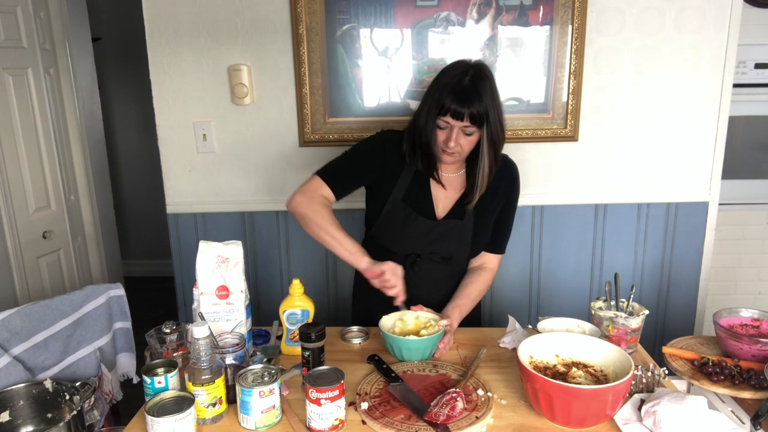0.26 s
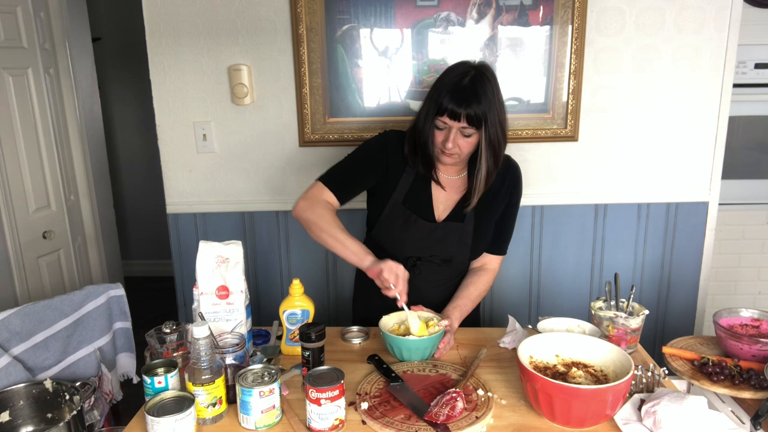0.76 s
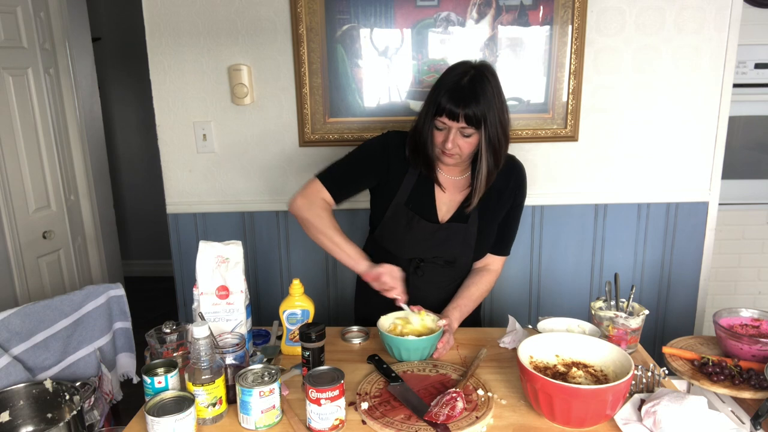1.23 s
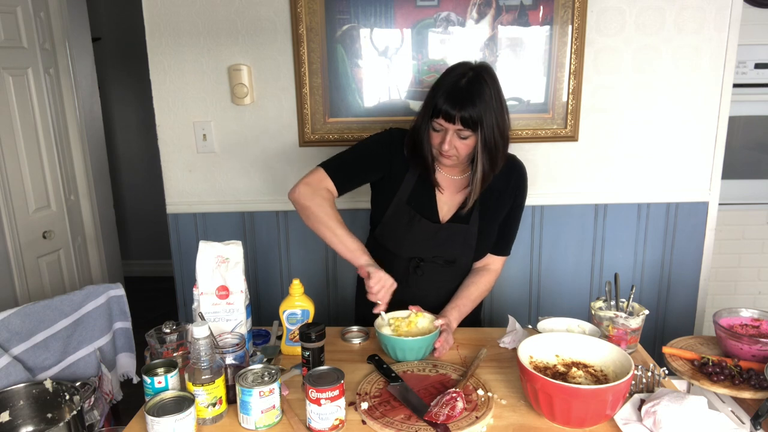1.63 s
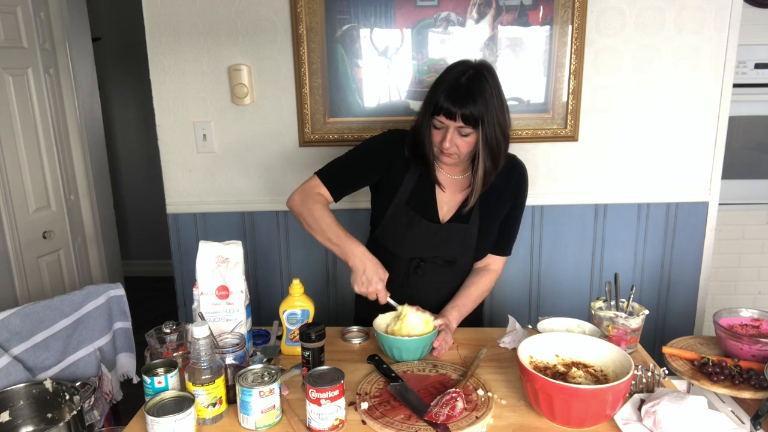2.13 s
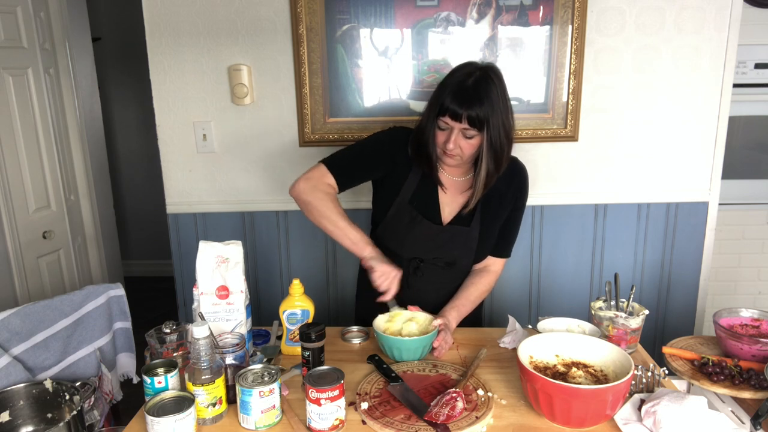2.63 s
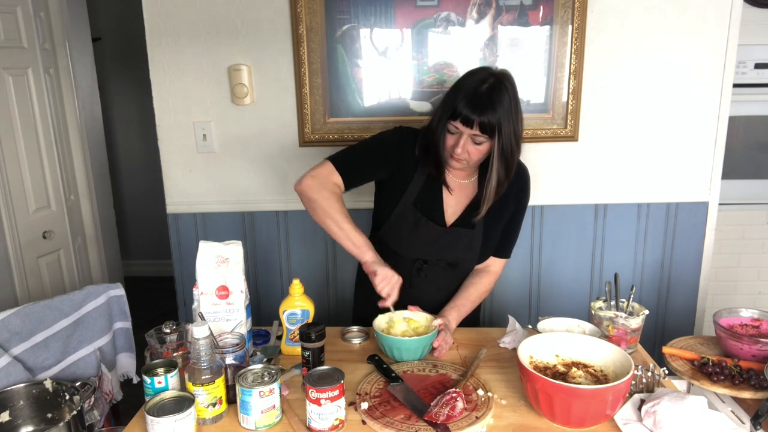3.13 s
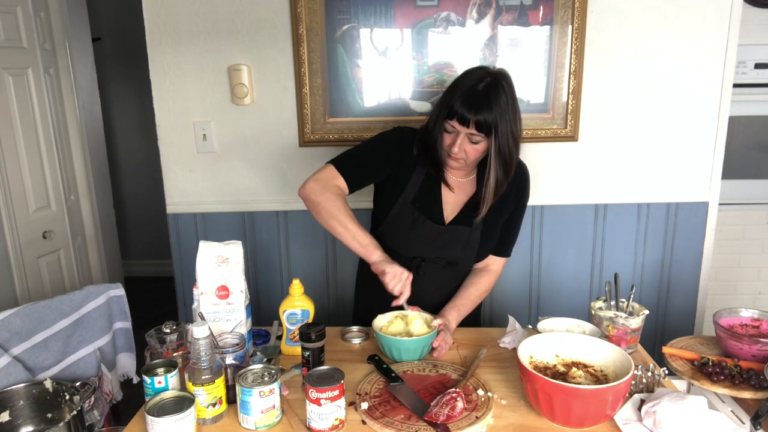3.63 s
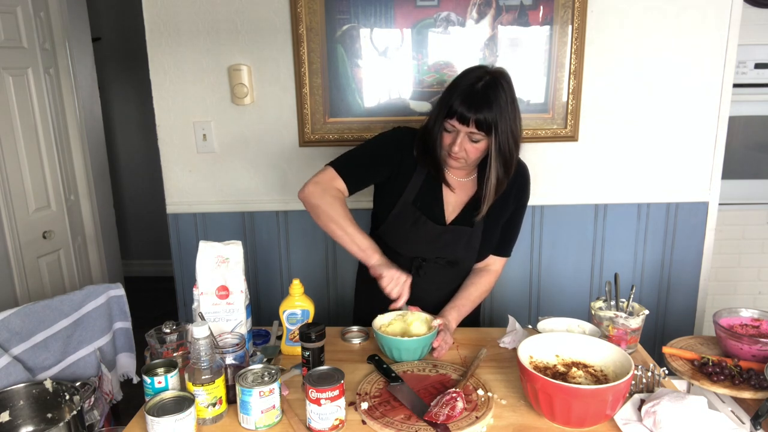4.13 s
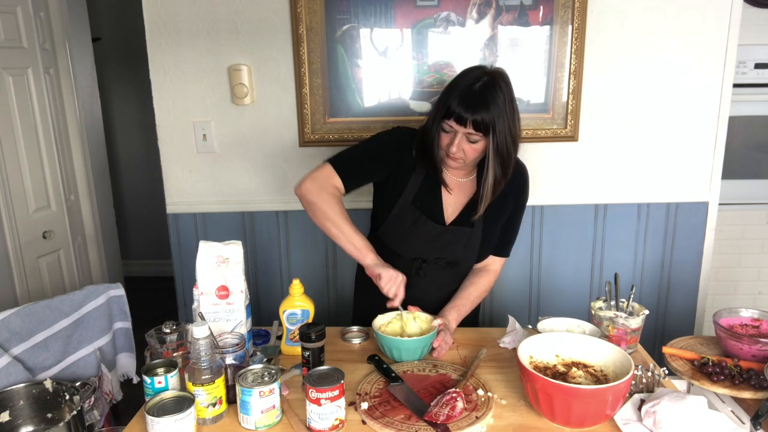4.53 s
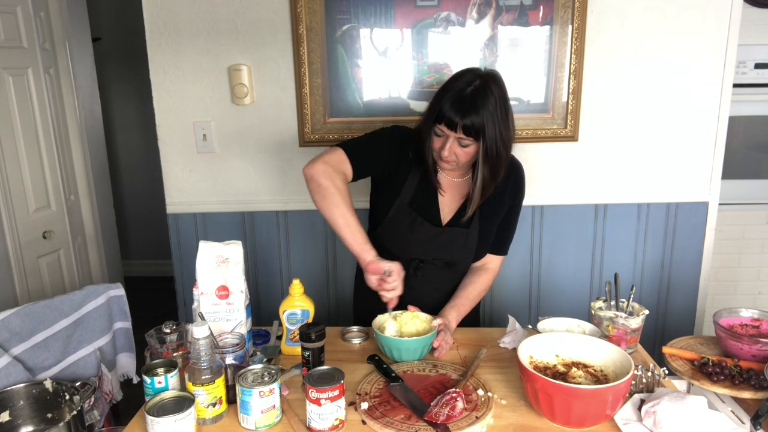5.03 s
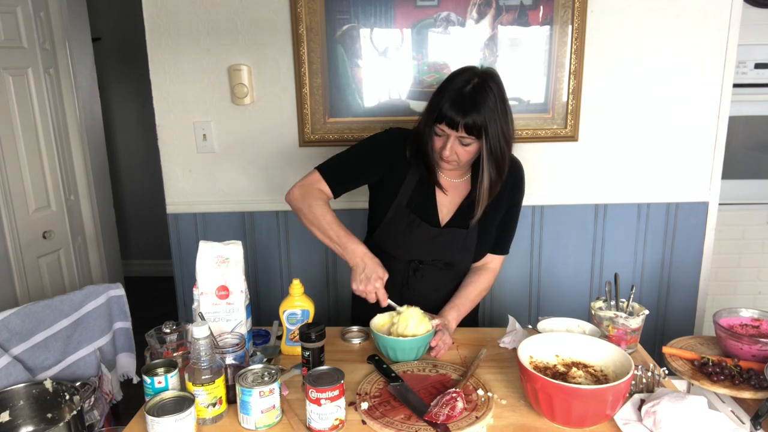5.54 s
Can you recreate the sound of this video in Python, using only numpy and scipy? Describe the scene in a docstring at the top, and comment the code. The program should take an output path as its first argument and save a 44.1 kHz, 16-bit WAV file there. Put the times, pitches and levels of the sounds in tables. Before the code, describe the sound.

Soft, sticky squelches of food being mashed in a bowl, broken by spoon knocks and dull table bumps in a kitchen.

```python
"""Soft food squishes and ticks as a metal spoon stirs and mashes it in a hand-held ceramic bowl.
Tiny wet pockets burst with each push. Now and then the spoon knocks on the bowl or drags along
its wall, and the bowl thuds on a wooden table. The filled bowl rings only briefly: the long
tails belong to the hard-walled kitchen, as the sound crosses it to the microphone."""
import sys
import numpy as np
from scipy import signal
from scipy.fft import rfft, irfft
from scipy.io import wavfile
from scipy.ndimage import uniform_filter1d

SR = 44100
rng = np.random.default_rng(int(sys.argv[2]) if len(sys.argv) > 2 else 0)


def wav_record(signal):
    """Record a signal, one row per channel, as 16-bit PCM in the file named by sys.argv[1]."""
    frames = np.transpose(np.atleast_2d(signal))
    bounded = np.clip(frames, -1, 1)
    # unit amplitude maps onto the largest positive 16-bit level
    quanta = np.round(bounded * 32767).astype(np.int16)
    wavfile.write(sys.argv[1], SR, quanta)


N = 255162
TIME = np.arange(N) / SR

# Table levels are relative: each function adds its own gain. A fade is the time to drop by 60 dB.
# pushes of the spoon: t/s, length/s, squish level/dB, churn level/dB, wetness (treble lift)/dB
PUSHES = [(0.0, 0.21, -76, -66, 16), (0.185, 0.23, -69.5, -75, 7), (0.449, 0.13, -65, -72.5, 5),
          (0.798, 0.093, -62, -73, 1), (1.446, 0.037, -60, -60, 14), (1.557, 0.115, -62.5, -65, -14),
          (2.03, 0.285, -72, -75.5, -2), (2.306, 0.3, -70.5, -70.5, 7), (2.583, 0.21, -69, -97, 12),
          (2.803, 0.13, -63, -72.5, 4.5), (2.992, 0.31, -75.5, -75, -1), (3.269, 0.462, -65, -75.5, -6.5),
          (3.695, 0.37, -67.5, -73, 4.5), (4.046, 0.12, -65.5, -70, 10), (4.234, 0.15, -69.5, -72, 4),
          (4.448, 0.22, -70, -74, 1), (5.586, 0.63, -72, -76, -7)]
# tone of the wet squish and of the low churn: f/Hz, level/dB
SQUISH_TONE = [(290, -29), (500, -1), (553, -10), (1040, -5.5), (1410, -3.5), (1530, -9), (1700, -4.5),
               (2360, -7), (4770, -8.5), (8600, -18), (15500, -18.5)]
CHURN_TONE = [(20, -49), (40, -17), (75, -6), (120, -5.5), (280, -1), (450, 2), (800, -10), (1600, -15),
              (5000, -75)]

def food_squish(squish_db=-6, churn_db=-8, pivot_hz=2800, patchy_db=4.5,
                attack_s=0.012, release_s=0.036, sag_db=-2):
    """Tiny wet pockets burst in patches over a soft low churn, following the push of the spoon."""
    squish_level, churn_level = np.zeros(N), np.zeros(N)
    for start, length, squish, churn, _ in PUSHES:
        t = np.arange(0, length, 1 / SR)
        effort = np.clip(np.minimum(t / attack_s, (length - t) / release_s), 0, 1)
        effort *= amp(sag_db * t / length)  # eases off as the food gives way
        add(squish_level, start, amp(squish) * effort)
        add(churn_level, start, amp(churn) * effort)
    starts, lengths, *_, lifts = np.transpose(PUSHES)
    wetness = np.interp(TIME, starts + lengths / 2, lifts)
    hz = np.fft.rfftfreq(N, 1 / SR)
    mash, patch_times = np.zeros(N), np.arange(0, TIME[-1], .05)
    for centre in np.geomspace(600, 13000, 9):
        band = hump(hz, centre, octaves=0.77) * amp(read(SQUISH_TONE, hz))
        pockets = irfft(rfft(grains(per_s=450, spread_db=5.5)) * band, N)
        patches = np.interp(TIME, patch_times, rng.standard_normal(len(patch_times)))
        mash += pockets * amp(patchy_db * patches + wetness * np.log10(centre / pivot_hz))
    churning = colour(grains(per_s=600, spread_db=2.5), CHURN_TONE)
    return amp(squish_db) * squish_level * unit(mash) + amp(churn_db) * churn_level * churning


# sticky food pops off the spoon: t/s, level/dB, air pocket f/Hz, top of the tear f/Hz
POPS = [(0.0099, -30, 1180, 5330), (0.204, -36, 3140, 7900), (0.3147, -31.5, 1440, 6900),
        (0.5168, -41, 1496, 7020), (0.6011, -40.5, 3460, 10900), (0.7958, -37.5, 3800, 9200),
        (1.455, -34, 3250, 7600), (1.5766, -37.5, 2670, 7100), (2.038, -38, 3800, 9900),
        (2.353, -35.5, 1190, 11400), (2.688, -44, 2800, 5640), (2.858, -32.5, 1050, 3950),
        (2.868, -40, 2800, 6000), (2.9861, -38.5, 1980, 5630), (3.0089, -39.5, 1390, 4800),
        (3.0197, -36, 1140, 5000), (3.06, -45.5, 6700, 14000), (3.2282, -40.5, 5440, 13000),
        (3.2996, -37.5, 850, 4520), (3.4496, -42, 3000, 11900), (3.8999, -35.5, 1440, 4020),
        (3.9538, -38, 2690, 4200), (4.0552, -38, 3200, 9300), (4.0988, -31, 3440, 5700),
        (4.1405, -33.5, 1720, 3000), (4.475, -42, 2500, 5600), (4.524, -42, 2900, 11000),
        (4.6538, -39.5, 2920, 4960)]

def food_pops(level_db=-2, hollow_db=3, crackle=0.34, strands_per_s=3000):
    """Air pockets tear open and sticky strands snap: small pockets tick, big ones squelch lower."""
    out, t = np.zeros(N), np.arange(SR // 12) / SR
    for start, db, low_hz, high_hz in POPS:
        size = 3000 / np.sqrt(low_hz * high_hz)  # bigger pockets crackle longer
        strands = rng.standard_normal(len(t)) * (rng.random(len(t)) < strands_per_s / SR)
        burst = crackle * size * strands * np.exp(-t / (0.0032 * size))
        burst[0] = 1  # the first tear
        def snap_db(hz):
            tear = -20 * np.log10(1 + (low_hz / (hz + 100)) ** 2 + (hz / high_hz) ** 6)
            return tear + hollow_db * hump(hz, 1.02 * low_hz, octaves=0.55)
        pop = signal.fftconvolve(burst, click(snap_db, lag_s=0.002004))
        add(out, start, amp(db + level_db) * pop / np.linalg.norm(pop))
    return out


# spoon hits bowl: t/s, level/dB, extra thud/dB, struck spot f/Hz, lift at that pitch/dB,
# treble edge f/Hz (higher for a harder hit), spoon ring level/dB
KNOCKS = [(0.8679, 0, -9, 1860, 11.5, 1880, -24), (1.1362, 2, 0.5, 1240, 3, 6000, -27),
          (1.7007, -3.5, -6, 1680, 8, 4100, -35), (1.7036, -5, 7, 760, 8.5, 1680, -34),
          (1.842, -11, 1.5, 1016, 14.5, 4984, -25), (1.8862, -13, -5, 1190, 13, 2400, -25),
          (1.9118, -15.5, 4.5, 1200, 7, 2800, -12), (4.8008, -5, -1, 3620, 6, 5200, 9.5),
          (5.3606, -10, -28, 1150, 9, 2220, -7), (5.3718, -4, -8, 792, 4.5, 3770, -16)]
# tone of a knock: f/Hz, level/dB
KNOCK_TONE = [(25, -25), (50, -26), (80, -2.5), (120, -27), (165, -1.5), (220, -4.5), (330, 7), (430, 5),
              (580, -2.5), (850, -6.5), (1700, -0.5), (3000, -3.5), (6500, 0), (16000, -3.5)]
# notes of the bowl, damped by food and hand, and of the spoon bouncing clear: f/Hz, level/dB, fade/s
BOWL_NOTES = [(843, 5.5, 0.036), (953, 0.5, 0.013), (1088, -5, 0.044), (1245, -6.5, 0.17),
              (1350, -4.5, 0.015), (1636, 1.5, 0.071), (1741, -18, 0.13), (2120, -16, 0.04),
              (3060, -3, 0.018), (3530, 3.5, 0.0068), (4140, -4, 0.0053), (4610, 4.5, 0.029),
              (4860, -3, 0.012), (5700, -8.5, 0.012), (6250, -12, 0.018), (7260, -8.5, 0.0089)]
SPOON_NOTES = [(2200, -4.5, 0.019), (2400, -1.5, 0.032), (2550, 2.5, 0.13), (2580, -0.5, 0.011),
               (4040, -5, 0.052), (4390, 2, 0.011), (4500, -22, .09), (6450, 3, 0.051), (6500, 3, 0.023),
               (6800, -15, .04), (9170, 0.5, 0.022)]

def spoon_knocks(level_db=-4, spoon_db=4, thud_hz=447, fall_db_per_decade=29.5):
    """Each hit thuds through the table and sets bowl and spoon ringing; harder hits are brighter."""
    out = np.zeros(N)
    bowl, spoon = ringing(BOWL_NOTES, click_gain=0.45), ringing(SPOON_NOTES, click_gain=0)
    for start, db, thud_db, spot_hz, spot_db, edge_hz, ring_db in KNOCKS:
        def contact_db(hz):
            thud = thud_db / (1 + (hz / thud_hz) ** 4)
            spot = spot_db * hump(hz, spot_hz, octaves=0.45)
            treble_loss = fall_db_per_decade * np.log10(np.hypot(1, hz / edge_hz))
            return read(KNOCK_TONE, hz) + thud + spot - treble_loss
        blow = click(contact_db, lag_s=0.003213)
        ring = bowl + amp(ring_db + spoon_db) * spoon
        add(out, start, amp(db + level_db) * signal.fftconvolve(blow, ring))
    return out


# drags along the bowl, one list a stroke: t/s, wall level/dB, grit level/dB, whine f/Hz, whine level/dB
SCRAPES = [
    [(1.662, -56.5, -66, 820, -60), (1.799, -46.5, -59.5, 940, -66), (1.847, -52, -61, 1130, -53.5),
     (1.915, -48.5, -58, 1154, -47), (1.96, -80, -58, 1130, -82)],
    [(5.035, -50.5, -63, 780, -64), (5.07, -50.5, -52.5, 868, -62), (5.14, -74, -46, 1305, -45),
     (5.189, -57.5, -49.5, 1260, -50), (5.215, -62.5, -52.5, 1200, -64), (5.355, -62.5, -56, 1100, -78)],
]
# tone of the rubbed wall and of the gritty treble: f/Hz, level/dB
WALL_TONE = [(60, -17), (200, -3.5), (350, 7.5), (600, 4), (900, -8.5), (1350, 4), (1800, -9), (3000, -5),
             (6000, -44), (15000, -52)]
GRIT_TONE = [(300, -17.5), (1500, -2), (2100, 6.5), (2800, 6), (3400, -4), (4600, 2.5), (6300, 1.5),
             (8000, -3), (9500, -7.5), (12500, -7.5), (16000, -18)]

def spoon_scrapes(wall_db=-7, grit_db=-5, whine_db=-9, width_hz=300, judder_db=2, judder_per_s=90):
    """The spoon sticks and slips, shaking the wall, with grit and a gliding whine where it touches."""
    out = np.zeros(N)
    pole = np.exp(-np.pi * width_hz / SR)
    for stroke in SCRAPES:
        times, *controls = np.transpose(stroke)
        pressure, roughness, whine_hz, swell = (np.interp(TIME, times, c) for c in controls)
        contact = np.clip(np.minimum(TIME - times[0], times[-1] - TIME) / .012, 0, 1)
        catches = np.interp(TIME * judder_per_s, np.arange(SR // 10), rng.standard_normal(SR // 10))
        slips = grains(per_s=2000, spread_db=4.0) * amp(judder_db * catches)
        # keep a narrow band of the slips that follows the whine's pitch
        turn = np.exp(2j * np.pi * np.cumsum(whine_hz) / SR)
        band = turn * signal.lfilter([1], np.poly([pole, pole]), slips / turn)
        whine = amp(whine_db + swell) * unit(band.real)
        wall = amp(wall_db + pressure) * colour(slips, WALL_TONE)
        grit = amp(grit_db + roughness) * colour(slips, GRIT_TONE)
        out += contact * (wall + whine + grit)
    return through(out, ringing(BOWL_NOTES, click_gain=0.41))


# the bowl bumps the table: t/s, level/dB, table boom level/dB
BUMPS = [(0.015, -43.5, 17), (0.203, -53, -11), (1.152, -35.5, -25), (1.194, -30, -8), (1.467, -60, 14),
         (2.388, -42, -5), (2.746, -50, -29), (3.482, -47.5, -26), (3.58, -46, -25), (4.272, -56, -26),
         (5.042, -44, 8), (5.419, -34.5, -15)]
# tone of a bump: f/Hz, level/dB
BUMP_TONE = [(30, -38), (75, -2), (120, -8.5), (260, 7.5), (420, 7.5), (650, 1.5), (1500, -20), (5000, -73)]

def bowl_bumps(level_db=16, boom_db=10, boom_hz=78, boom_fade_s=0.13, rock_s=0.00913, rock_db=-4):
    """The bowl's foot rocks to rest in three dull pushes that set the table top booming."""
    out = np.zeros(N)
    thud = click(lambda hz: read(BUMP_TONE, hz), lag_s=0.00298)
    for start, db, boom in BUMPS:
        push = signal.fftconvolve(thud, ringing([(boom_hz, boom + boom_db, boom_fade_s)]))
        for k in range(3):
            delay = k * rock_s * rng.uniform(0.738, 1.325)
            add(out, start + delay, amp(db + level_db + k * rock_db) * push)
    return out


# how long the room's tail lasts: f/Hz, fade/s
TAIL_FADE = [(100, 0.33), (400, 0.35), (1000, 0.31), (2800, 0.4), (7000, 0.31), (14000, 0.26)]
# its strength against the direct sound: f/Hz, level/dB
TAIL_TONE = [(100, 12.5), (350, 5), (800, 5.5), (1700, 4.5), (4000, 1), (7000, 3.5), (12000, -3.5)]

def room_tail(onset_s=0.0022):
    """Countless wall echoes blur into a tail in which each pitch dies at its own pace."""
    hz, t, bands = signal.stft(rng.choice([-1., 1.], SR), nperseg=256, fs=SR)
    bands *= np.exp(-np.log(1000) * t / read(TAIL_FADE, hz)[:, None])
    onset = 1 - np.exp(-(TIME[:SR] / onset_s) ** 2)
    spectrum = rfft(signal.istft(bands, nperseg=256)[1][:SR] * onset)
    spectrum /= np.sqrt(uniform_filter1d(abs(spectrum) ** 2, size=45))  # even out the tone
    spectrum *= amp(read(TAIL_TONE, np.arange(len(spectrum))))
    return irfft(spectrum)[:SR * 3 // 4]


# low notes that ring between the walls: f/Hz, level/dB, fade/s
ROOM_NOTES = [(75.9, 16, 1), (165.7, 19, 0.69), (254.6, 14.7, 0.15), (307.6, 16.1, 0.32), (370, 6.7, 0.45),
              (414, 16, 0.42), (490, 8, 0.96)]
# echoes from nearby surfaces: t/s, gain
ECHOES = [(.0007, 0.44), (.0016, 0.71), (.0024, 0.15), (.0041, 0.092), (.0078, 0.11), (0.014, 0.16)]

def kitchen(x, notes_db=-2, echo_db=-1, blends=3):
    """The room adds its low notes, plus echoes and a tail that shift as bowl and arm move."""
    out = x + amp(notes_db) * through(x, ringing(ROOM_NOTES, click_gain=0))
    for k in range(blends):
        response = room_tail()
        for delay, gain in ECHOES:
            add(response, delay * rng.uniform(.8, 1.2), np.array([gain * amp(echo_db)]))
        share = np.cos(np.pi * (TIME / 2 + k / blends)) * np.sqrt(2 / blends)
        out += through(x * share, response)
    return out


# tone of the quiet room: f/Hz, level/dB
AIR_TONE = [(15, -14), (25, -11), (91, -4.5), (174, -9), (255, -6.5), (500, -9), (881, -12.5), (1180, -15),
            (1870, -19.5), (2260, -18.5), (2460, -21), (3680, -21), (4450, -21), (7630, -24.5),
            (15800, -33)]

def room_air(level_db=-69.5):
    """Steady faint hiss and hum of the room."""
    return amp(level_db) * colour(rng.standard_normal(N), AIR_TONE)


def amp(db):
    """Turns decibels into a gain."""
    return 10 ** (np.asarray(db) / 20)


def unit(x):
    """Scales a sound to an average strength (rms) of 1."""
    return x / np.sqrt(np.mean(x ** 2) + 1e-20)


def read(points, hz):
    """Reads between (f/Hz, value) points, spaced by pitch."""
    f, value = np.transpose(points)
    return np.interp(np.log(hz + 1), np.log(f + 1), value)


def hump(hz, centre_hz, octaves):
    """A smooth hill of height 1 around one pitch."""
    return np.exp(-(np.log2((hz + 1) / centre_hz) / octaves) ** 2)


def add(mix, start_s, sound):
    """Lays a sound into the mix."""
    part = mix[max(round(start_s * SR), 0):][:len(sound)]
    part += sound[:len(part)]


def colour(x, tone):
    """Gives a long sound a tone, at strength 1."""
    return unit(irfft(rfft(x) * amp(read(tone, np.fft.rfftfreq(N, 1 / SR))), N))


def click(db_at, lag_s, size=4096):
    """A click with the tone db_at(hz); bending waves bring the bass up to lag_s later."""
    hz = np.fft.rfftfreq(size, 1 / SR)
    log_gain = np.log(amp(db_at(hz)))
    phase = -signal.hilbert(np.r_[log_gain, log_gain[-2:0:-1]]).imag[:len(hz)]  # a sharp start
    delay = lag_s / (1 + (hz / 700) ** 2)
    phase -= 2 * np.pi * np.cumsum(delay) * SR / size
    return irfft(np.exp(log_gain + 1j * phase))


def ringing(notes, click_gain=1):
    """What a tap sets off: a bare click plus dying notes."""
    t = np.arange(SR // 2) / SR
    out = np.zeros(len(t))
    for hz, db, fade_s in notes:
        decay = np.log(1000) / fade_s
        out += amp(db) * 2 * decay / SR * np.exp(-decay * t) * np.cos(2 * np.pi * hz * t)
    out[0] += click_gain
    return out


def through(x, response):
    """Plays a sound through an object or room, given its response to a tap."""
    return signal.oaconvolve(x, response)[:N]


def grains(per_s, spread_db):
    """Random tiny clicks of uneven size, at strength 1."""
    size = amp(spread_db * np.minimum(rng.exponential(1, N), 4))
    return unit(size * rng.choice([-1, 1], N) * (rng.random(N) < per_s / SR))


def scene():
    """Spoon, bowl and food in the kitchen, the same in both ears."""
    stirring = spoon_knocks() + spoon_scrapes() + bowl_bumps() + food_pops() + food_squish()
    mono = kitchen(stirring) + room_air()
    return np.array([mono, mono])


def record(dry, bass_hz=42, top_hz=15950):
    """The microphone loses the deepest bass, then the highest treble is cut."""
    lean = signal.sosfilt(signal.butter(2, bass_hz, "high", fs=SR, output="sos"), dry)
    treble_cut = signal.firwin(511, top_hz, window=("kaiser", 9), fs=SR)
    return signal.oaconvolve(lean, treble_cut[None], "same")


dry = scene()
out = record(dry)
wav_record(out)
```